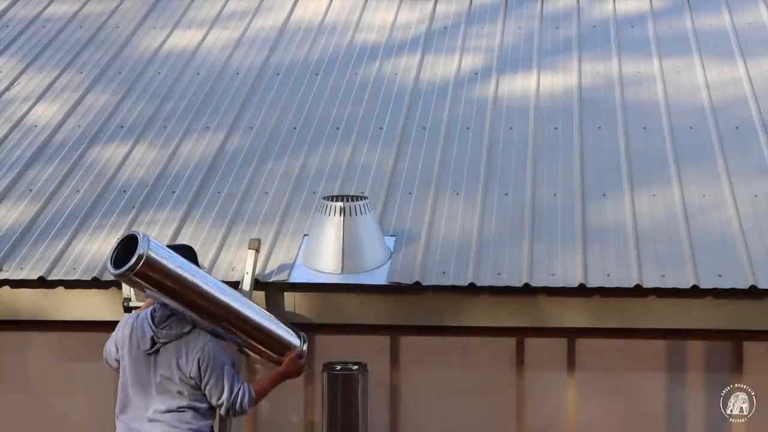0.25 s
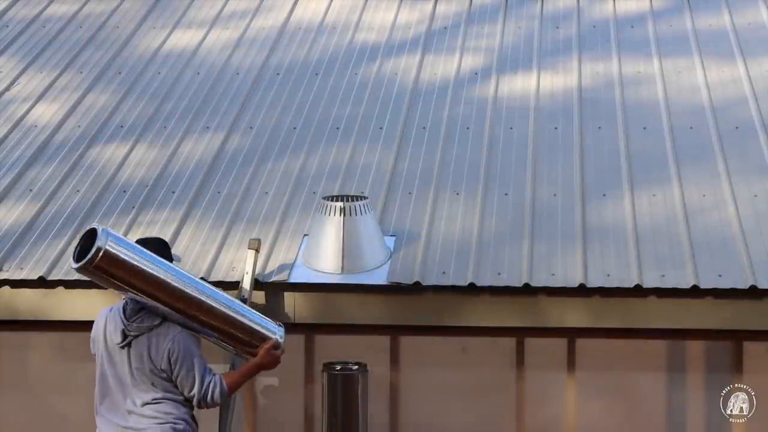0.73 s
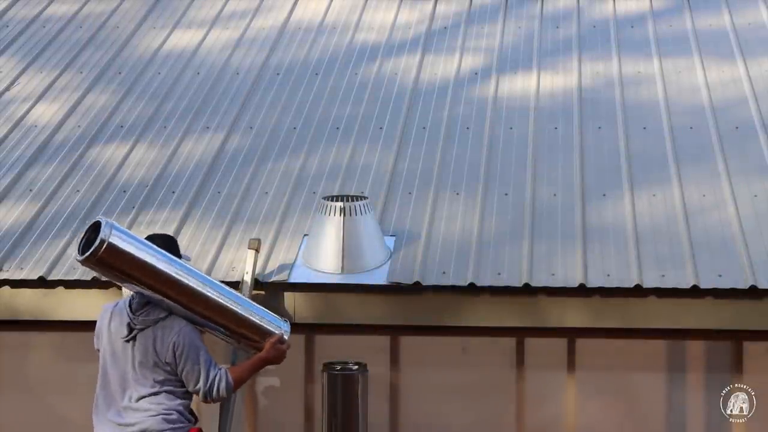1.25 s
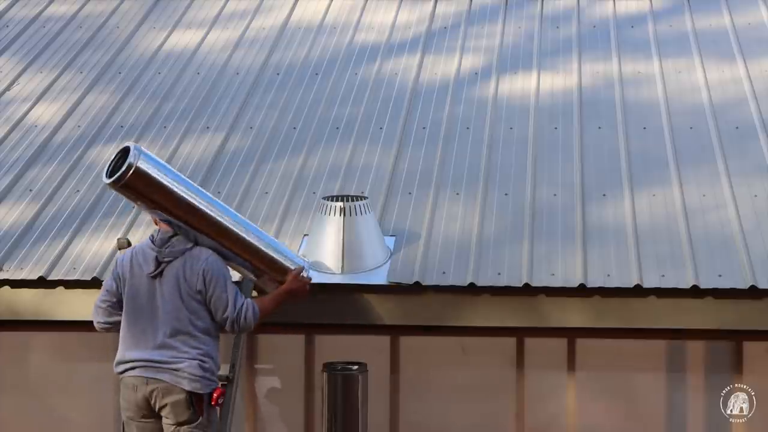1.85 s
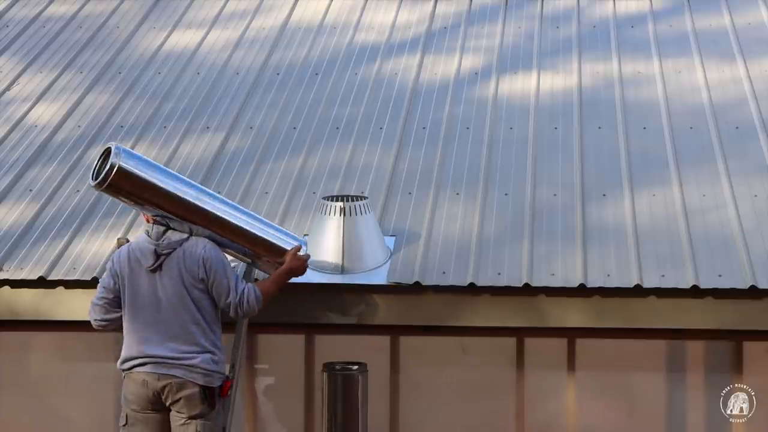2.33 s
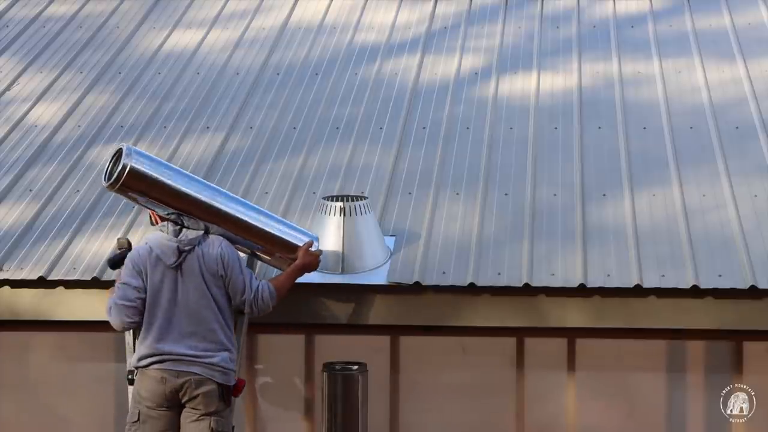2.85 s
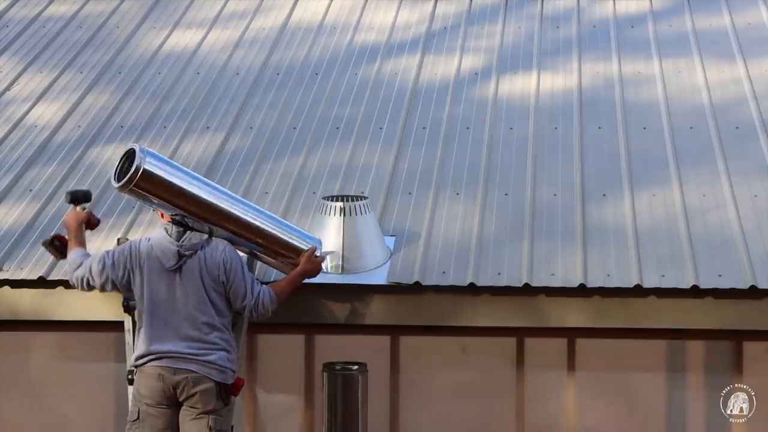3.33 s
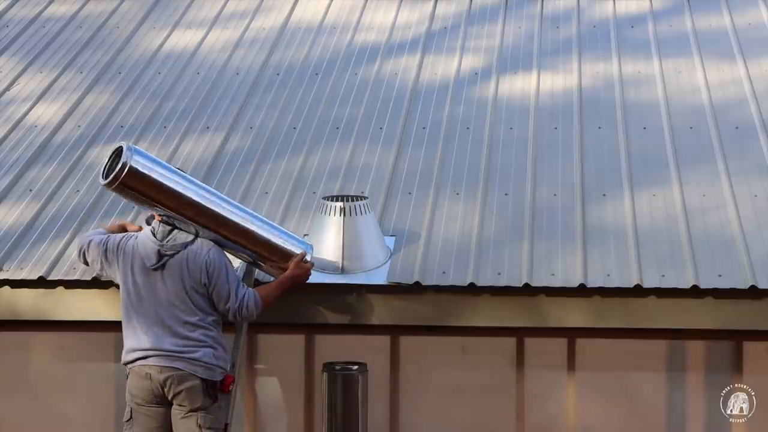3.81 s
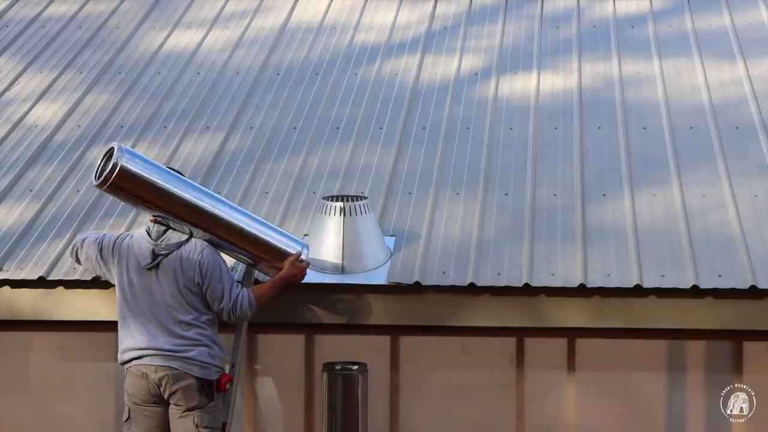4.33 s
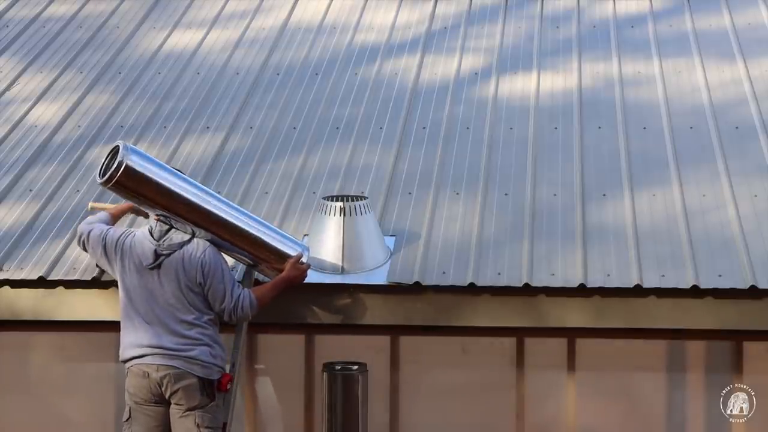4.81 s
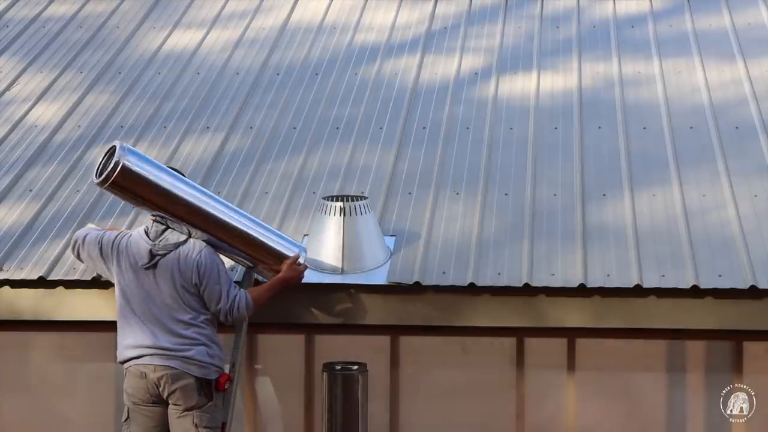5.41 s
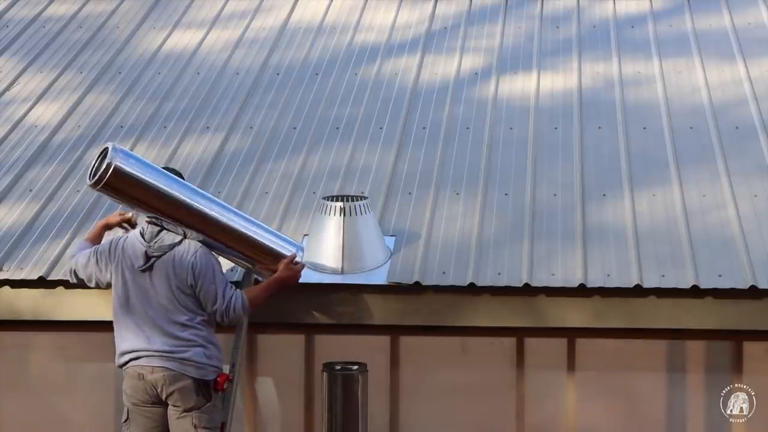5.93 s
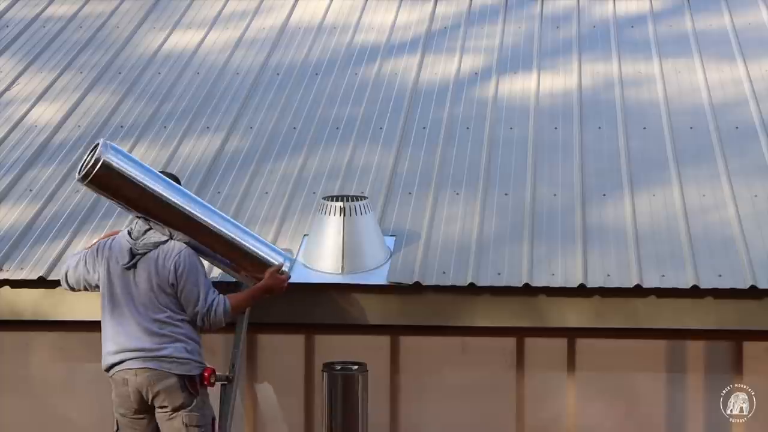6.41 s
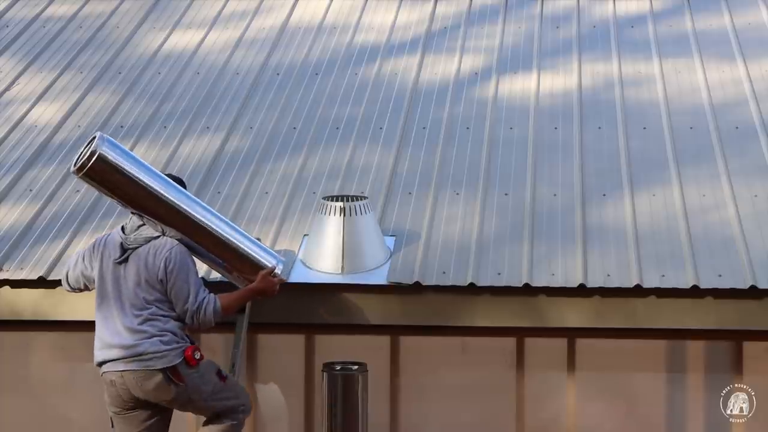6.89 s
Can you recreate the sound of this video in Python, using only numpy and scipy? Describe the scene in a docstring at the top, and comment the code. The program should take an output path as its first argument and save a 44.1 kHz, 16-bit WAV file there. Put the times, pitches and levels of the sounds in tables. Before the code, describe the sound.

An open yard with soft steady hiss and a faint drifting low rumble. From 0 to 2.5 seconds a worker climbs a ladder with a steel pipe: quiet gritty rubbing, small dull bumps, brief scrapes, and bright clinks near 0.06 and 0.7; a tighter cluster of bumps and clinks comes around 1.8-2.15. Then it is nearly still, with tiny ticks around 2.8-3.6. At 3.9-4.15 hollow knocks land on the corrugated metal roof, the last a brighter, louder clank; softer contacts follow at 4.4 and 4.7. At 5.37 two firm thumps lead to a huge slam at 5.6, with a hard tick, booming mid-low sheet tone and short buzz, and another blow right behind it. The roof rings down for about a second with a long faint echo. Rubbing resumes from 6.3, with a small scrape at 6.5, a ringing clink at 6.8 and ladder rattles at 7.0.

```python
"""Yard beside a corrugated metal roof: a worker on a ladder shoulders a steel chimney pipe, sets tools down.
Roof: shaped noise and decaying sines per blow; one slam adds a tick, opposed modes and seam buzz.
Ladder bumps, clinks: noise with band-wise decay plus ringing modes. Pipe rubs, scrapes: trains of tiny slips.
Behind: a long faint echo, hiss, distant rumble. The recorder ducks loud blows and limits peaks."""
import sys
import numpy as np
from scipy import signal
from scipy.fft import rfft, irfft
from scipy.io import wavfile
from scipy.ndimage import uniform_filter1d, minimum_filter1d

SR = 44100
rng = np.random.default_rng(int(sys.argv[2]) if len(sys.argv) > 2 else 0)


def generate_wav(sig):
    """Save sig (samples, or channels by samples) to the path in sys.argv[1] as 16-bit PCM at SR."""
    pcm = np.round(np.clip(np.atleast_2d(sig).T, -1, 1) * 32767).astype(np.int16)
    wavfile.write(sys.argv[1], SR, pcm)


N = 315315
T = np.arange(SR) / SR  # one second in the life of a hit

# roof blows: start_s, level_db, treble_db, struck-spot note_hz, note_db, rattle_s
ROOF_BLOWS = [(3.940, -34.5, -8, 283.5, -29, 0.042), (4.071, -32.5, -15.5, 626, -36, .05),
              (4.146, -22.5, 7, 806.5, -20.5, 0.04), (4.422, -37, 5.5, 276, -45, 0.063),
              (4.732, -33, -5, 510.4, -23, 0.033), (5.3724, -24, -8.5, 351.5, -20, 0.012),
              (5.401, -23.5, -2.5, 531, -27.5, 0.059), (5.558, -25.5, 4, 278, -29, 0.066),
              (5.600, -15, -6, 477, -15.5, 0.032), (5.672, -17.5, -5.5, 578, -17.5, 0.1)]
# slammed sheet modes: mode_hz, level_db, t60_s
SLAM_MODES = [(215, -20, 0.074), (245, -13.5, .12), (496, -13.5, 0.2), (622, -8.5, 0.09),
              (674.5, -1, 0.094), (953, -11, 0.046), (1224, -12, 0.047), (2390, -17, 0.026),
              (2610, -29, .04)]
# long roof modes, stirred by every blow: mode_hz, level_db, t60_s
ROOF_MODES = [(139.1, -7, 1), (250, -13.5, 0.95), (285, -4, 0.69), (389, -11.5, 0.99), (528, 2, 0.54),
              (580, -3, 0.64), (711, -10.5, .7), (820, -19, 1), (890, -16.5, 0.75), (1250, -26, 0.96),
              (1303, -11.5, 0.48), (2010, -24, .45), (3320, -13.5, 0.36)]
# dense roof ring, spectrum shape: band_hz, density_db_per_hz
ROOF_SPECTRUM = [(30, -20), (70, -5), (130, -4.5), (175, -11.5), (270, 3.5), (420, -1.5), (650, 1),
                 (850, -2), (1100, -10), (1500, -15), (2400, -18), (3600, -21), (4400, -32), (7000, -41),
                 (9000, -50.5), (16000, -64)]
# dense roof ring, decay: band_hz, t60_s
ROOF_DECAY = [(100, 1), (300, 0.83), (700, 0.61), (1500, 0.46), (3500, 0.42), (7000, 0.42), (14000, .17)]
# scattered sheet modes, strength: band_hz, level_db
SHEET_BANDS = [(180, 1.5), (450, 3), (800, -4.5), (1200, -15.5), (3500, -24)]
# seam buzz, spectrum shape: band_hz, density_db_per_hz
BUZZ_SPECTRUM = [(1200, -23), (2000, -21), (2500, 2.5), (3000, -11), (3550, 7), (4100, -16), (5000, -13),
                 (5800, -42), (7000, -15), (8500, -44.5), (16000, -36.5)]
# ladder steps and bumps: start_s, level_db, treble_db, bass_db, rattle_s
LADDER_BUMPS = [(0.0, -44, -6, 0, 0.024), (.490, -46, 5, 15, 0.015), (1.215, -45, 5, 8, 0.1),
                (1.268, -42, -6, 6, 0.075), (1.365, -46.5, 10.5, 7, 0.015), (1.512, -38, -3.5, -2, 0.031),
                (1.585, -45, -26, 12.5, 0.014), (1.957, -40, -34, -1.5, 0.11), (2.018, -45.5, 5, 7, .011),
                (2.045, -36, 0.5, 5, 0.014), (2.079, -41, -3, 3, 0.036), (2.157, -43.5, -1, -6, 0.012),
                (2.838, -49, -19, -18, 0.067), (3.470, -44, -6, -12, 0.0069),
                (4.724, -34.5, -10.5, -5, 0.095), (6.997, -37.5, 5, -9, .12), (7.073, -38, -6, -6, 0.024)]
# ladder body, spectrum shape: band_hz, density_db_per_hz
LADDER_SPECTRUM = [(50, -16), (130, -5), (185, -19), (260, -1), (400, -3), (600, -1.5), (800, 3.5),
                   (1300, -11.5), (2400, -8), (3600, -13), (6000, -31.5), (16000, -41)]
# ladder body, decay: band_hz, t60_s
LADDER_DECAY = [(200, 0.93), (800, 0.56), (2500, 0.28), (9000, 0.16)]
# ladder modes: mode_hz, level_db, t60_s
LADDER_MODES = [(265, -0.5, 1), (287, -1.5, 0.95), (389.4, 4, 0.45), (720, 0, 0.35), (800, 4, .3),
                (780, -4, .25), (960, -10, 0.14), (2260, -6.5, 0.13)]
# sharp metal contacts: start_s, crack_db, treble_db, part (name), ring_db
CLINKS = [(.058, -35.5, 6, "rung", -39.5), (.722, -40, -4, "pipe", -37.5), (1.367, -40, -9.5, "rung", -51),
          (1.807, -40.5, -8.5, "rung", -53), (1.995, -57, 22, "rung", -63), (2.017, -39.5, -6, "pipe", -45),
          (2.053, -39, -16, "buckle", -43), (3.205, -49.5, -1, "pipe", -59),
          (4.147, -29, -8.5, "pipe", -32), (4.422, -33, -35, "pipe", -41),
          (6.81, -40.5, -12, "buckle", -35.5), (7.006, -36.5, 6.5, "rung", -33.5)]
# contact crack, spectrum shape: band_hz, density_db_per_hz
CRACK_SPECTRUM = [(300, -33), (1000, -21), (1500, -3), (2300, 4.5), (3600, 3), (4400, -2.5), (5300, -2.5),
                  (6500, -3.5), (8500, -7), (12000, -15), (16000, -15)]
# contact crack, decay: band_hz, t60_s
CRACK_DECAY = [(1500, 0.18), (5000, 0.24), (14000, 0.089)]
# modes of small ringing parts, by part name: mode_hz, level_db, t60_s
PART_MODES = {"pipe": [(2099, -14, 0.15), (2415, 3, 0.055), (2540, -13, .07), (3120, 1, 0.097),
              (3250, -23, 0.16), (3780, -9, 0.12), (3940, -14, 0.072), (4585, -11, 0.08), (4850, -23, .12)],
              "rung": [(2120, -10.5, 0.25), (2520, -22.5, .07), (3140, -3.5, 0.16), (3670, -2, 0.12),
              (3840, -10, 0.063), (5000, 5, 0.053), (5460, 2.5, 0.04), (6100, -32, 0.042),
              (8210, -12, 0.11)], "buckle": [(1940, -11.5, 0.62), (2670, -4.5, .11), (2730, -6, 0.13),
              (2930, -14, 0.11), (3100, -10, 0.16), (3480, -11, 0.15), (3900, -8, 0.11), (4940, -15, 0.12),
              (4890, -7, 0.067)]}
# pipe-on-ladder scrapes: start_s, length_s, level_db
SCRAPES = [(0.369, 0.034, -49), (0.468, 0.092, -48), (0.639, 0.038, -47), (0.842, 0.076, -47),
           (1.146, 0.056, -44), (2.257, 0.033, -52.5), (2.373, 0.16, -54.5), (2.47, 0.04, -52),
           (3.558, 0.034, -50), (3.903, 0.1, -47), (4.401, 0.035, -48), (4.701, .04, -49.5),
           (6.49, .04, -42.5), (6.958, 0.092, -46.5)]
# climbs, pipe rubbing on the shoulder: start_s, end_s, level_db
CLIMBS = [(0, 2.54, -54.5), (6.301, 7.15, -57.5)]
# yard echo colour: band_hz, level_db
YARD_SPECTRUM = [(60, -19), (250, -9), (450, -8.5), (750, -5.5), (1200, -2.5), (3000, 1), (8000, -15)]
# yard echo, decay: band_hz, t60_s
YARD_DECAY = [(150, 1.3), (400, 1.6), (750, 2.38), (2000, 1.2), (8000, 1.14)]
# hiss and rumble, spectrum shape: band_hz, density_db_per_hz
AIR_SPECTRUM = [(20, -14), (55, 0), (96, 4), (170, -8), (280, -11), (520, -15), (790, -11.5), (1100, -20),
                (2000, -22), (4000, -24.5), (9000, -27), (16000, -28.5)]
# distant rumble, gain: time_s, gain_db
RUMBLE_GAIN = [(0, -1.5), (3.3, -1.5), (6.6, 0), (7.15, 5)]

SLAM_S = 5.5998  # heavy drop that sets the whole sheet swinging
BASS_EVEN_DB, BASS_DB_PER_DB = -28, 0.74  # blows softer than this level are bass-heavy, harder ones lean
BUILD_SHARE = 0.15  # build-up time constant as a share of rattle_s
# a harder contact chatters longer
CLINK_RATTLE_S, CLINK_REF_DB, CLINK_RATTLE_DB_PER_DB = 0.011, -41.5, 0.5
REST_DB, SETTLE_S = -63, 0.28  # rubbing while standing; ramp before and after each climb
AIR_DB = -51.5
EDGE_HZ = 15900


def roof(modes_db=-8, first_db=-8):
    """Each blow stirs the sheets' dense ring, their long modes and the note of the struck spot."""
    out = np.zeros(N)
    for start_s, level_db, treble_db, note_hz, note_db, rattle_s in ROOF_BLOWS:
        bass_db = BASS_DB_PER_DB * (BASS_EVEN_DB - level_db)
        dense = spot(noise(ROOF_SPECTRUM, SR), uneven_db=4)
        dense = fade(shelves(dense, treble_db, bass_db, treble_hz=1190), ROOF_DECAY)
        dense = dense * chatter(rattle_s, tail_db=-1.5, rough_db=-1.0)
        tilted = [(hz, db + treble_db * (hz > 1000), t60_s) for hz, db, t60_s in ROOF_MODES]
        modes = amp(modes_db) * ring(tilted) + scattered(level_db=-20.5, treble_db=treble_db)
        # the sound grows as the bending waves spread over the sheet
        spread = 1 - (1 - amp(first_db)) * np.exp(-T / (BUILD_SHARE * rattle_s))
        blow = amp(level_db) * (dense + modes) + amp(note_db) * cluster(note_hz)
        add(out, start_s, spread * blow)
    return out


def slam(boom_db=1, swell_s=0.0015, tick_db=-4, tick_decay_s=0.0006,
         buzz_db=-23, buzz_t60_s=0.3, buzz_build_s=0.013):
    """A hard tick; the sheet's main modes swing up fast, neighbours opposed, and its seams buzz."""
    out = np.zeros(N)
    # band_hz, density_db_per_hz
    tick_spectrum = [(200, -18), (900, 3), (2000, 7), (3600, 6), (5000, -18), (8000, -28), (16000, -31)]
    tick = noise(tick_spectrum, SR) * np.exp(-T / tick_decay_s)
    tick = tick * (1 - np.exp(-T / 0.00023))
    opposed = (-1) ** np.arange(len(SLAM_MODES))
    boom = ring(SLAM_MODES, signs=opposed) * (1 - np.exp(-T / swell_s))
    buzz = noise(BUZZ_SPECTRUM, SR) * amp(-60 * T / buzz_t60_s)
    buzz = buzz * (1 - np.exp(-T / buzz_build_s))
    add(out, SLAM_S, amp(boom_db) * boom + amp(tick_db) * tick + amp(buzz_db) * buzz)
    return out


def ladder(rise_s=0.0018, modes_db=-12):
    """Boots and pipe bump the ladder, which rings and rattles against the eave."""
    out = np.zeros(N)
    for start_s, level_db, treble_db, bass_db, rattle_s in LADDER_BUMPS:
        body = spot(noise(LADDER_SPECTRUM, SR), uneven_db=5.5)
        body = fade(shelves(body, treble_db, bass_db, treble_hz=1380), LADDER_DECAY)
        body = body * chatter(rattle_s, tail_db=-6, rough_db=3.0)
        bump = body + amp(modes_db) * ring(LADDER_MODES)
        add(out, start_s, amp(level_db) * bump * (1 - np.exp(-T / rise_s)))
    return out


def clinks(echo_db=-8, echo_decay_s=0.022):
    """Metal meets metal: a bright crack and a few short high modes, thickened by the nearby roof."""
    out = np.zeros(N)
    for start_s, crack_db, treble_db, part, ring_db in CLINKS:
        rattle_s = CLINK_RATTLE_S * amp(CLINK_RATTLE_DB_PER_DB * (crack_db - CLINK_REF_DB))
        crack = shelves(noise(CRACK_SPECTRUM, SR), treble_db, 0, treble_hz=4940)
        crack = fade(crack, CRACK_DECAY) * chatter(rattle_s, tail_db=-17, rough_db=0.5)
        tones = amp(ring_db) * ring(PART_MODES[part])
        echoes = rng.standard_normal(SR) * np.exp(-T / echo_decay_s)
        echoes = echoes / np.linalg.norm(echoes)
        tones = tones + amp(echo_db) * signal.fftconvolve(tones, echoes)[:SR]
        add(out, start_s, amp(crack_db) * crack + tones)
    return out


def scrapes(attack_s=0.0067, treble_db=4.0, bass_db=-6):
    """Metal on metal slips more brightly; each scrape catches quickly and runs out."""
    pressure = np.zeros(N)
    for start_s, length_s, level_db in SCRAPES:
        stroke = np.minimum(T / attack_s, 1) * np.exp(-(T / length_s) ** 2)
        add(pressure, start_s, amp(level_db) * stroke)
    return pressure * evened(shelves(slips(), treble_db, bass_db, treble_hz=1380))


def slide():
    """The pipe rubs on the shoulder during each climb and quietens when the worker stands."""
    time_s = np.arange(N) / SR
    level_db = np.full(N, float(REST_DB))
    for start_s, end_s, climb_db in CLIMBS:
        moving = np.clip(1 + np.minimum(time_s - start_s, end_s - time_s) / SETTLE_S, 0, 1)
        level_db = level_db + moving * (climb_db - REST_DB)
    return slips() * amp(level_db)


def yard(x, wet_db=-29.5, build_s=0.041):
    """Scattered echoes from the surroundings, longest in the low middle."""
    time_s = np.arange(2 * SR) / SR
    tail = fade(noise(YARD_SPECTRUM, 2 * SR), YARD_DECAY) * (1 - np.exp(-time_s / build_s))
    return amp(wet_db) * signal.fftconvolve(x, tail / np.linalg.norm(tail))[:N]


def air(drift_db=2.0):
    """Steady microphone hiss over a distant outdoor rumble that drifts."""
    time_s = np.arange(N) / SR
    drift_hz = np.geomspace(0.5, 5, 8)
    drift = evened(sum(np.sin(2 * np.pi * (hz * time_s + rng.random())) for hz in drift_hz))
    steady = amp(AIR_DB) * noise(AIR_SPECTRUM, N)
    rumble = signal.lfilter(*signal.butter(1, 200, fs=SR), steady)
    gain_db = drift_db * drift + np.interp(time_s, *np.transpose(RUMBLE_GAIN))
    return steady + rumble * (amp(gain_db) - 1)  # only the low part moves


def scattered(level_db, treble_db, count=40):
    """Every spot of the sheet wakes its own handful of modes."""
    hz = np.geomspace(SHEET_BANDS[0][0], SHEET_BANDS[-1][0], count)
    hz = hz * (1 + rng.uniform(-0.0402, 0.0397, count))
    db = level_db + read(SHEET_BANDS, hz) + treble_db * (hz > 1000)
    return ring(np.transpose([hz, db, read(ROOF_DECAY, hz)]))


def cluster(note_hz, width=0.16, t60_s=0.49, count=9):
    """The ribs split the note of a spot into close modes that beat; width is a share of note_hz."""
    offsets = np.linspace(-1, 1, count) + rng.uniform(-0.099, 0.101, count)
    return ring([(note_hz * (1 + width * x), -5 - 8 * x ** 2, t60_s) for x in offsets])


def spot(x, uneven_db):
    """Each contact point favours some low resonances and sits on the nodes of others."""
    hz = np.geomspace(150, 1500, 36)
    db = uneven_db * np.clip(rng.standard_normal(len(hz)), -1.5, 1.5)
    db = db * signal.windows.tukey(len(hz), 0.2)
    return evened(colour(x, np.transpose([hz, db])))


def chatter(rattle_s, tail_db, rough_db, grain_s=0.002):
    """Loose metal strikes again and again for a moment, then only rings on."""
    slaps = uniform_filter1d(rng.standard_normal(SR), max(int(grain_s * SR), 2))
    slaps = np.clip(evened(slaps), -2, 2)
    contact = np.exp(-(T / (2 * rattle_s)) ** 2)
    onset = np.minimum(T / 0.00084, 1)
    return (amp(tail_db) + contact * amp(rough_db * slaps)) * onset


def slips(slips_per_s=600, spread_db=3, slip_t60_s=0.063):
    """Tiny random slips of the pipe, each with a short metallic ring."""
    out = np.zeros(N)
    # band_hz, density_db_per_hz
    spectrum = [(100, 0.5), (300, 0.5), (800, 5), (1300, -4.0), (2500, -5.5), (4500, -16.5), (12000, -40.0)]
    for _ in range(8):  # eight ring shapes share the slips
        strength = amp(spread_db * np.minimum(rng.exponential(1, N), 3))
        clicks = (rng.random(N) < slips_per_s / 8 / SR) * strength
        body = noise(spectrum, SR) * amp(-60 * T / slip_t60_s)
        out += signal.oaconvolve(clicks, body)[:N]
    return evened(out)


def ring(modes, signs=None):
    """Decaying sines; the place of the blow decides the sign of each, random unless given."""
    if signs is None:
        signs = rng.choice([-1, 1], len(modes))
    out = np.zeros(SR)
    for sign, (hz, db, t60_s) in zip(signs, modes):
        out += sign * amp(db - 60 * T / t60_s) * np.sin(2 * np.pi * hz * T)
    return out


def shelves(x, treble_db, bass_db, treble_hz, bass_hz=350):
    """A hard contact lifts the treble, a heavy one the bass."""
    hz = np.fft.rfftfreq(len(x), 1 / SR)
    high = 1 - 1 / (1 + (hz / treble_hz) ** 4)
    low = 1 / (1 + (hz / bass_hz) ** 4)
    return irfft(rfft(x) * amp(treble_db * high + bass_db * low), len(x))


def fade(x, decay):
    """Lets each band die at its own speed."""
    hz, time_s, bands = signal.stft(x, SR, nperseg=256)
    bands = bands * amp(-60 * time_s / read(decay, hz)[:, None])
    return signal.istft(bands, SR, nperseg=256)[1][:len(x)]


def noise(spectrum, size):
    """Noise of rms 1 with the given spectrum."""
    return evened(colour(rng.standard_normal(size), spectrum))


def colour(x, spectrum):
    """Filters by a table of band_hz, level_db."""
    hz = np.fft.rfftfreq(len(x), 1 / SR)
    return irfft(rfft(x) * amp(read(spectrum, hz)), len(x))


def read(points, hz):
    """Reads a table on a log-frequency axis."""
    point_hz, value = np.transpose(points)
    return np.interp(np.log(hz + 1), np.log(point_hz + 1), value)


def amp(db):
    """Decibels to gain."""
    return 10 ** (np.asarray(db) / 20)


def evened(x):
    """Scales to rms 1."""
    return x / np.sqrt(np.mean(x ** 2) + 1e-20)


def add(mix, start_s, sound):
    """Mixes a sound in at start_s."""
    part = mix[max(round(start_s * SR), 0):][:len(sound)]
    part += sound[:len(part)]


def scene():
    """All the handling, its echo and the open air."""
    work = roof() + slam() + ladder() + clinks() + scrapes() + slide()
    return (work + yard(work) + air())[None]


def record(dry, limit_db=-12, recover_db_per_s=24, lag_s=0.05, full_scale=1):
    """Slow gain control ducks power above limit_db, a fast limiter holds peaks; then the band limit."""
    power_db = 10 * np.log10(abs(uniform_filter1d(dry[0] ** 2, size=600)) + 1e-12)
    # peak follower: jumps up at once, falls at a steady rate
    fall_db = np.arange(N) * recover_db_per_s / SR
    held_db = np.maximum.accumulate(power_db + fall_db) - fall_db
    over_db = np.maximum(held_db - limit_db, 0)
    pole = np.exp(-1 / (lag_s * SR))
    ducked = dry * amp(-signal.lfilter([1 - pole], [1, -pole], over_db))
    hold = minimum_filter1d(full_scale / np.maximum(abs(ducked), full_scale), size=91)
    limited = ducked * uniform_filter1d(hold, size=91)
    band_limit = signal.firwin(511, EDGE_HZ, window=("kaiser", 9), fs=SR)
    return signal.oaconvolve(limited, band_limit[None], "same")


dry = scene()
out = record(dry)
generate_wav(out)
```